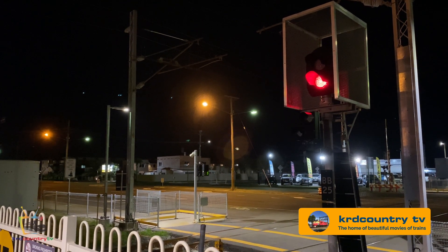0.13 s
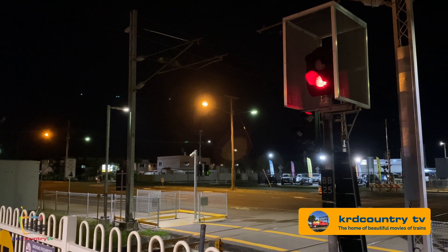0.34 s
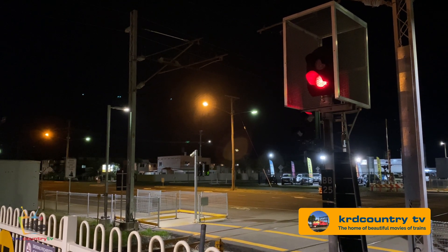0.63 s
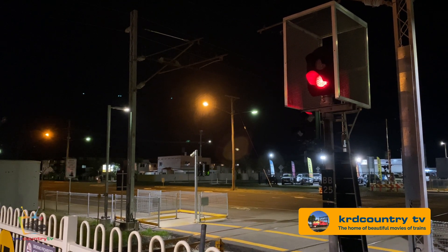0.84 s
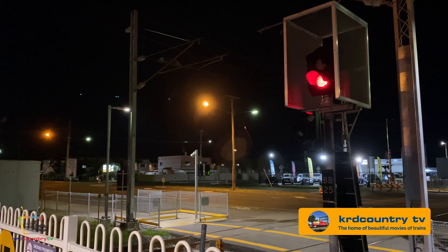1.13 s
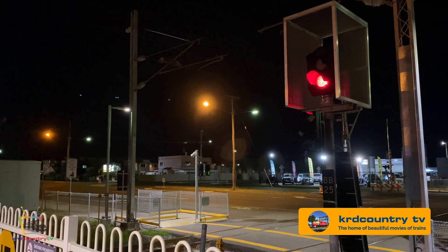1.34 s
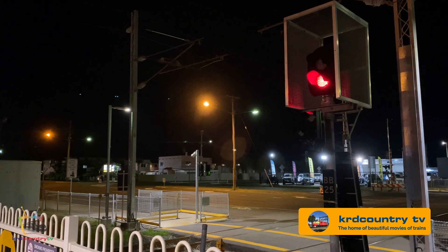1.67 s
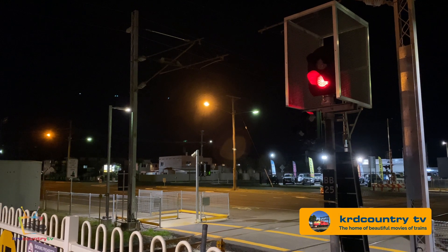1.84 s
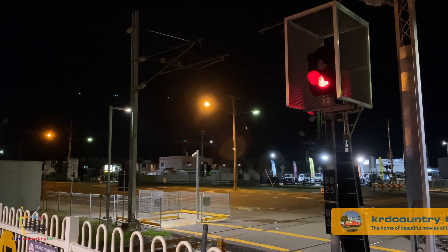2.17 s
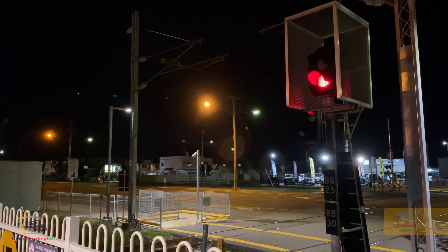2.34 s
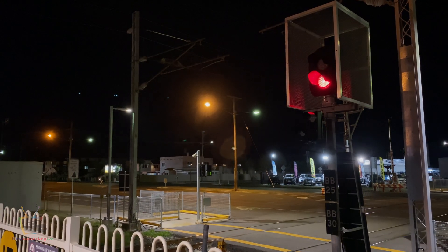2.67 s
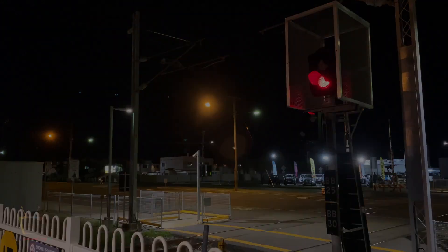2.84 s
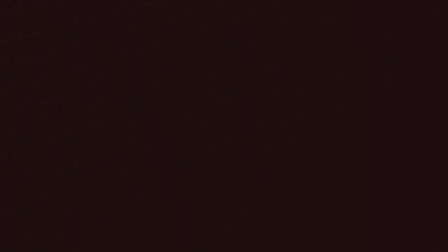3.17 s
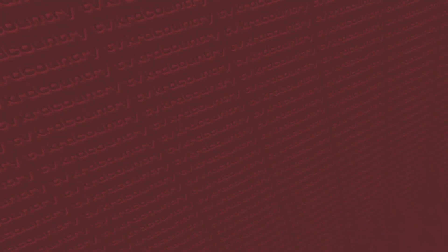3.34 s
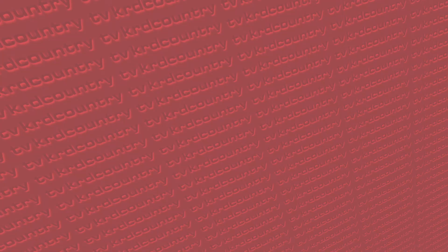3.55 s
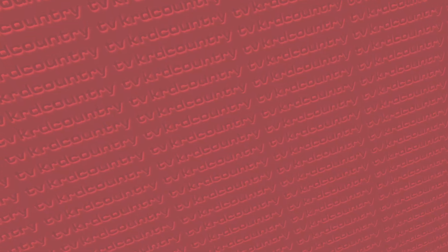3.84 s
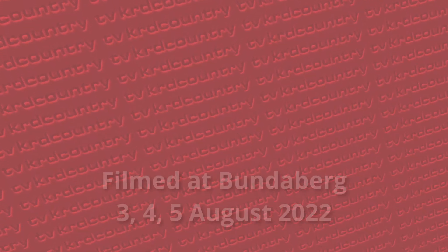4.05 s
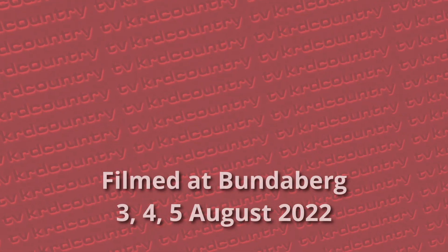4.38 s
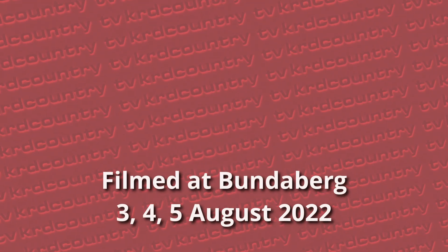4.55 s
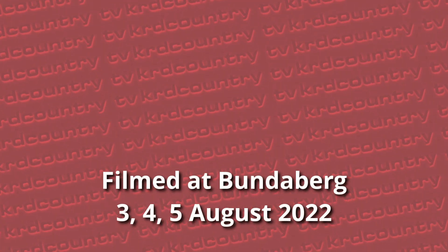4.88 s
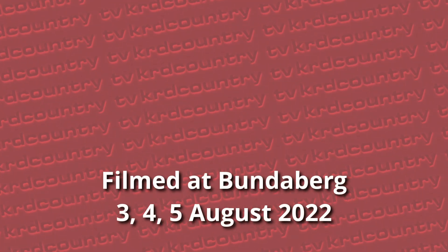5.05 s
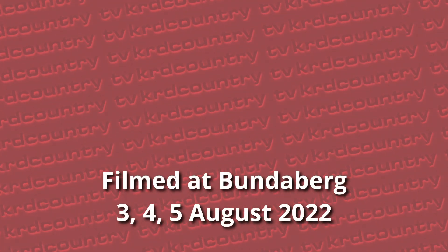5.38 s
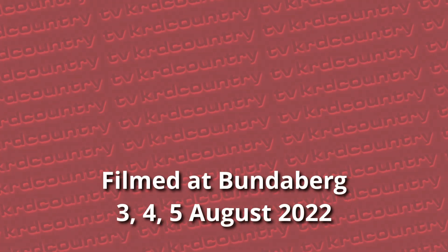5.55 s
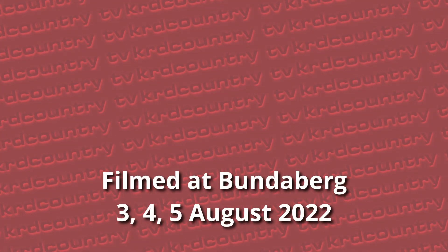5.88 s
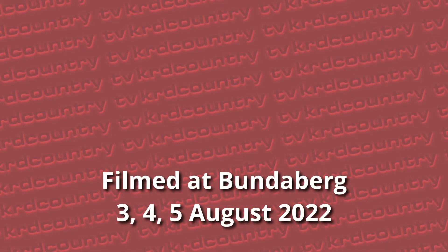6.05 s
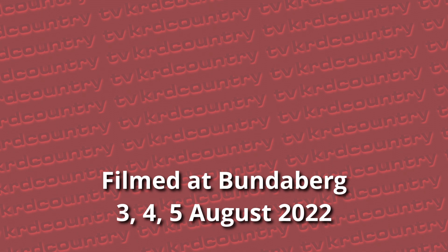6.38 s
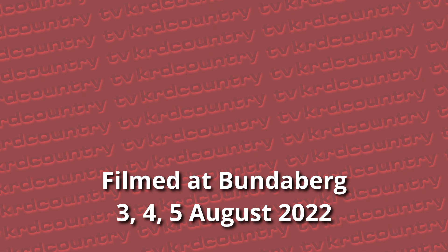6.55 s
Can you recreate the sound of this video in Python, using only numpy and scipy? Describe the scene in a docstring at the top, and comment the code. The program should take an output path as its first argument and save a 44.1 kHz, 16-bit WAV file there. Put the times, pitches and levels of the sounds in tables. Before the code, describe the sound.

Distant low diesel idling at a night crossing switches after three seconds to a close, strong, slowly swelling engine drone with whirring fan and ringing metal.

```python
"""At a level crossing at night, a diesel train engine idles at about 800 rpm, heard from two spots in turn.
At the far spot the exhaust is a low, uneven throb; a quick cross-fade leads to the louder near spot,
with a firing hum that swells slowly, clattering cylinders, a ringing housing and a whining cooling fan.
Hums, buzz and fan are sums of sine tones; throb, clatter, hiss and ringing are shaped noise, part of
which repeats with every engine cycle. Short sine tones come and go on top."""
import sys
import numpy as np
from scipy import signal
from scipy.fft import rfft, irfft, next_fast_len
from scipy.io import wavfile
from scipy.ndimage import uniform_filter1d, map_coordinates

SR = 44100
rng = np.random.default_rng(int(sys.argv[2]) if len(sys.argv) > 2 else 0)


def to_wav(s):
    """Save 16-bit WAV."""
    ch = np.atleast_2d(s).T  # columns
    pcm = np.round(np.clip(ch, -1, 1) * 32767)  # PCM
    wavfile.write(sys.argv[1], SR, pcm.astype(np.int16))


N = 296352

CYCLE_HZ = 6.675  # four-stroke cycles a second, each two turns of the crankshaft
FIRINGS = 12  # firings in each cycle
BLADE_HZ = 225.1  # fan blades passing a second


def amp(db):
    """Turn decibels into a gain."""
    return 10 ** (np.asarray(db) / 20)


def unit(x):
    """Scale x to an average (rms) strength of 1."""
    return x / np.sqrt(np.mean(x ** 2) + 1e-20)


def along(points, hz):
    """Read a table of (frequency, value) points on a log frequency axis."""
    f, value = np.transpose(points)
    return np.interp(np.log(hz + 1), np.log(f + 1), value)


def wobble(rate):
    """Draw a smooth random curve with `rate` random points a second."""
    coarse = np.arange(0, N + 64, 64)  # every 64th sample is enough for a slow curve
    knots = rng.standard_normal(int(N * rate / SR) + 4)
    curve = map_coordinates(knots, [coarse * rate / SR])
    return np.interp(np.arange(N), coarse, curve)


def swell(rows):
    """Turn (time, level) rows into a dB curve about their mean, one value per sample."""
    s, db = np.transpose(rows)
    return np.interp(np.arange(N) / SR, s, db - db.mean())


def filtered(x, response):
    """Filter x with a response that depends on frequency and may be complex."""
    m = next_fast_len(N + SR // 4)  # spare room after the end
    spectrum = rfft(x, m) * response(np.fft.rfftfreq(m, 1 / SR))
    return irfft(spectrum, m)[..., :N]


def turns(hz, drift):
    """Count the turns of a governed shaft whose speed hunts slightly."""
    speed = hz * (1 + drift * wobble(3))
    return np.cumsum(speed) / SR


def lines(turn, orders, levels_db, waver_db, smear, swells=None):
    """Sum tones locked to a shaft; each wavers on its way through the air, at random or along its swell."""
    out = np.zeros(N)
    for order, db in zip(np.round(orders), levels_db):
        phase = 2 * np.pi * (order * turn + rng.random()) + smear * wobble(6)
        change_db = (swells or {}).get(order, waver_db * wobble(3.88))
        out += amp(db + change_db) * np.sqrt(2) * np.sin(phase)
    return out


def clatter(cycle, repeat):
    """Make two noises; a share of their power returns every cycle, as from valves and injectors."""
    size = round(SR / CYCLE_HZ)
    # random phases, equally strong at every multiple of the cycle
    spectrum = np.exp(2j * np.pi * rng.random((2, size // 2 + 1)))
    one_cycle = unit(irfft(spectrum, size))
    pattern = one_cycle[:, (cycle * size).astype(int) % size]
    repeat = np.clip(repeat, 0, 1)
    fresh = rng.standard_normal((2, N))
    return np.sqrt(repeat) * pattern + np.sqrt(1 - repeat) * fresh


def spread(pair, gain, alike):
    """Mix two noises into a coloured left and right of rms 1 with the given likeness."""
    def shares(hz):
        angle = np.arccos(np.clip(along(alike, hz), -.995, .995)) / 2
        return gain(hz) * np.array([np.cos(angle), np.sin(angle)])

    mid, side = filtered(pair, shares)
    return unit(np.array([mid + side, mid - side]))


def microphones(pair, balance, lead):
    """Give the two microphones different colours and arrival phases, as set by frequency."""
    side = np.array([[.5], [-.5]])  # half of each difference goes to either side
    return filtered(pair, lambda hz: amp(side * along(balance, hz)) * np.exp(1j * side * along(lead, hz)))


def patchy(pair, depth_db):
    """Make narrow stretches of the sound's spectrum flicker slightly."""
    spectrum = signal.stft(pair, nperseg=512)[2]
    field = rng.standard_normal(spectrum.shape[1:])
    field = uniform_filter1d(field, size=4, axis=0)  # smooth across frequency
    field = uniform_filter1d(field, size=16, axis=1)  # smooth across time
    return signal.istft(spectrum * amp(depth_db * unit(field)), nperseg=512)[1][:, :N]


# Random short tones, one row of settings: rate [per s], lowest f/Hz, highest f/Hz, typical length t/s,
# level/dB at the lowest, change of level [dB per octave]
STREAK_SETTINGS = (19.5, 750, 2400, 0.1, -42.5, -10.5)


def streaks():
    """Parts of the housing sing for a moment, at random times and pitches; higher ones are weaker."""
    per_s, low_hz, high_hz, length_s, db, tilt_db = STREAK_SETTINGS
    when, pitch, life = rng.random((int(per_s * N / SR), 3)).T
    hz = low_hz * (high_hz / low_hz) ** pitch
    level_db = db + tilt_db * np.log2(hz / low_hz)
    return list(zip(when * N / SR, length_s * (.5 + life), hz, level_db))


# The clearest tones that come and go in the drone: middle t/s, length t/s, f/Hz, level/dB at the top
CLEAR_TONES = [(1.1, 1.5, 543, -51.5), (3.3, .4, 600, -32), (3.43, .25, 624, -36.5), (3.62, .22, 610, -39),
               (4.12, 0.28, 622, -32.5), (4.3, 0.37, 613, -35), (5.34, .18, 623, -34),
               (5.56, 0.3, 620, -34), (5.96, 0.45, 602, -34.5), (6.25, .2, 622, -41)]


def brief_tones(extra=()):
    """Short tones, plus any extra ones, rise out of the machinery and sink back in a smooth arch."""
    t = np.arange(N) / SR
    out, waver = np.zeros(N), .6 * wobble(9)  # phase waver in radians
    for middle_s, length_s, hz, db in list(CLEAR_TONES) + list(extra):
        on = np.abs(t - middle_s) < length_s / 2
        arch = np.cos(np.pi * (t[on] - middle_s) / length_s)
        phase = 2 * np.pi * (hz * t[on] + rng.random()) + waver[on]
        out[on] += amp(db) * arch * np.sqrt(2) * np.sin(phase)
    return out


# A hum not locked to the engine, one row: f/Hz, level/dB
LOOSE_HUM = (318.2, -40)


def side_hum():
    """A second hum just under one of the exhaust lines beats against it."""
    hz, db = LOOSE_HUM
    return lines(turns(hz, drift=0.0021), [1], [db], waver_db=3.0, smear=0.56)


# Tones of the cooling fan: multiple of the blade rate, far level/dB, near level/dB
FAN_LINES = [(1, -56.5, -38.5), (2, -49, -39.5), (3, -49, -39.5), (5, -78, -61), (6, -80, -49)]


def cooling_fan(blades, near, waver_db, smear, swells=None):
    """Passing fan blades sound tones at multiples of their rate."""
    multiples, far_db, near_db = np.transpose(FAN_LINES)
    return lines(blades, multiples, near_db if near else far_db, waver_db, smear, swells)


# Ringing of the engine housing: f/Hz, width [Hz], level/dB
HOUSING_RINGS = [(598.6, 22, -40.5), (619.7, 17, -38.5), (709, 28, -47), (766, 18, -45), (1027, 30, -48.5),
                 (1560, 11, -59), (1815, 16, -55.5), (2042, 18, -58)]


def housing(cycle, alike):
    """The clatter rings the panels and ducts of the engine housing, each in a narrow band."""
    out = np.zeros((2, N))
    for hz, width, db in HOUSING_RINGS:
        mode = lambda f: 1 / (1 + (2 * (f - hz) / width) ** 4)
        out += amp(db) * spread(clatter(cycle, repeat=0.087), mode, alike)
    return out


def machinery(cycle, body_db, hiss_db, colour, alike, repeat, knock):
    """Cylinder clatter swells at each firing, under the smoother hiss of cooling air."""
    low = lambda hz: 1 / np.sqrt(1 + (hz / 1500) ** 12)  # clatter below about 1500 Hz, hiss above
    body_gain = lambda hz: amp(along(colour, hz)) * low(hz)
    hiss_gain = lambda hz: amp(along(colour, hz)) * np.sqrt(1 - low(hz) ** 2)
    firing = 1 + knock * np.cos(2 * np.pi * FIRINGS * cycle)
    body = spread(clatter(cycle, repeat) * firing, body_gain, alike)
    hiss = patchy(spread(clatter(cycle, repeat=0.2), hiss_gain, alike), depth_db=1.6)
    body_level = amp(body_db + 0.43 * wobble(16))
    hiss_level = amp(hiss_db + 0.27 * wobble(22))
    return body_level * body + hiss_level * hiss


SETTLE_DB, SETTLE_S, SETTLE_HZ = 3, 0.93, 850  # extra at the start, fade time, where the upper part begins


def settling(x):
    """The upper part of the sound starts a little louder and settles."""
    upper = filtered(x, lambda hz: 1 - 1 / (1 + (hz / SETTLE_HZ) ** 4))
    extra_db = SETTLE_DB * np.exp(-np.arange(N) / SR / SETTLE_S)
    return x + (amp(extra_db) - 1) * upper


# Colour of the exhaust rumble: f/Hz, relative level/dB
RUMBLE_COLOUR = [(20, -25), (31, -16), (42, -5), (55, 9.5), (80, 2.5), (110, 1), (160, -15), (250, -14),
                 (500, -74)]


def rumble(cycle, alike, throb):
    """Unequal cylinders make the exhaust noise lope once a cycle."""
    lope = 1 + throb * np.cos(2 * np.pi * cycle)
    noise = spread(clatter(cycle, repeat=0.5), lambda hz: amp(along(RUMBLE_COLOUR, hz)), alike)
    return unit(lope) * noise


# Thin buzz of the high exhaust lines: multiples of the engine cycle
HIGH_ORDERS = [126, 144, 150, 156, 162, 198, 252, 270, 288, 306, 342, 360]
# and for each multiple its level/dB
HIGH_LEVELS = [-50.5, -46.5, -53, -52, -55, -55, -62, -58, -59, -62, -60, -59]


def exhaust_buzz(cycle):
    """High multiples of the engine cycle waver strongly and make a thin buzz."""
    return lines(cycle, HIGH_ORDERS, HIGH_LEVELS, waver_db=3.0, smear=0.83)


# Exhaust hum: multiples of the engine cycle (12 is the firing rate)
EXHAUST_ORDERS = [6, 7, 9, 10, 12, 13, 15, 17, 18, 21, 26, 30, 33, 35, 36, 48, 54, 72]


def exhaust_hum(cycle, levels_db, waver_db, smear, swells=None):
    """Exhaust pulses sound as tones at multiples of the engine cycle."""
    return lines(cycle, EXHAUST_ORDERS, levels_db, waver_db, smear, swells)


# Exhaust hum at the far spot, one value for each multiple: level/dB
FAR_HUM_LEVELS = [-48, -54, -61, -57, -37, -58, -59, -51, -46, -53, -55.5, -53, -64, -59, -45.5, -52, -57,
                  -67]
# Colour of the machinery: f/Hz, relative level/dB
FAR_MACHINE_COLOUR = [(70, -26), (135, -1), (200, -6.5), (300, -6), (420, -6.5), (510, -8.5), (700, -7),
                      (870, -11), (1050, -9.5), (1250, -14), (1600, -14), (1900, -15), (2250, -19.5),
                      (2900, -22.5), (3800, -28.5), (4900, -30.5), (6000, -28.5), (7500, -42.5),
                      (10000, -44.5), (12000, -53), (14000, -45), (15000, -52)]
# Left-right likeness: f/Hz, coherence [1 is the same on both sides]
FAR_LIKENESS = [(60, 0.91), (170, 1), (250, 0.63), (290, 0.35), (450, 0.66), (700, 0.78), (950, 0.27),
                (1200, 0.65), (1650, 0.63), (2050, 0.18), (2550, 0.75), (3400, .15), (4800, .38),
                (8000, 0.16)]
# Left minus right: f/Hz, level/dB
FAR_SIDES = [(60, -1.5), (110, -4), (240, -5.5), (450, -1.5), (570, 1.5), (900, -1), (1250, 1.5),
             (1750, -1.8), (4000, -0.5), (8000, 0)]
# How far the left is ahead of the right: f/Hz, phase [radians]
FAR_PHASE_LEAD = [(70, 0), (200, 0.54), (330, 1.27), (500, 1.6), (800, 2), (1000, 3), (1700, 2.9),
                  (2350, 0), (3200, 1.3), (3800, -1), (5000, 2.5), (6300, 7)]


def far_spot(cycle, blades):
    """Distant and off to one side: mostly the low throb of the exhaust."""
    hum = exhaust_hum(cycle, FAR_HUM_LEVELS, waver_db=1.2, smear=0.12)
    fan = cooling_fan(blades, near=False, waver_db=1.5, smear=0.48)
    throb = amp(-41.5) * rumble(cycle, FAR_LIKENESS, throb=0.092)
    works = settling(machinery(cycle, body_db=-36.5, hiss_db=-51.5, colour=FAR_MACHINE_COLOUR,
                               alike=FAR_LIKENESS, repeat=0.33, knock=0.037))
    pair = hum + fan + throb + works + brief_tones()
    return microphones(pair, FAR_SIDES, FAR_PHASE_LEAD)


# Exhaust hum at the near spot, one value for each multiple: level/dB
NEAR_HUM_LEVELS = [-47, -47.5, -45, -47, -32.5, -43, -39, -49, -34, -50, -45, -43.5, -48.5, -46.5, -34,
                   -40.5, -41, -42.5]
# Slow swells of exhaust lines 12, 36, 54 and 72, used about their mean: t/s, level/dB
SWELL_12 = [(3.1, -28), (3.35, -37.5), (3.6, -30), (4.5, -31.5), (5, -29), (5.5, -28), (6.1, -31),
            (6.6, -29)]
SWELL_36 = [(3.05, -35), (3.35, -28), (3.65, -32.5), (4.05, -36), (4.4, -34), (4.75, -28.5), (5.2, -32),
            (5.75, -29.5), (6.3, -32.5), (6.7, -32.5)]
SWELL_54 = [(3.05, -47), (3.45, -43), (3.72, -38), (4.05, -39), (4.5, -42), (4.95, -47), (5.25, -32),
            (5.55, -55), (5.85, -38), (6.05, -33), (6.2, -46), (6.35, -37), (6.7, -35)]
SWELL_72 = [(3.05, -48), (3.8, -38), (4.5, -38), (4.9, -37.5), (5.2, -45), (5.6, -37.5), (6.05, -47),
            (6.25, -40), (6.7, -47)]
# Slow swells of fan lines 3 and 6, used about their mean: t/s, level/dB
FAN_SWELL_3 = [(3, -48), (3.3, -37), (3.55, -32), (3.85, -36.5), (4.15, -37.5), (4.6, -40), (5, -33.5),
               (5.45, -36.5), (5.9, -37.5), (6.2, -30), (6.45, -47), (6.7, -43)]
FAN_SWELL_6 = [(3.2, -47.5), (3.5, -53), (3.85, -53), (4.05, -46), (4.5, -46.5), (4.9, -62), (5.4, -48),
               (6, -56), (6.6, -46.5)]
# Colour of the machinery: f/Hz, relative level/dB
NEAR_MACHINE_COLOUR = [(70, -22), (135, -3.5), (200, -1), (270, -3.5), (420, -3.5), (520, -5.5),
                       (655, -5.5), (720, -4), (870, -11), (1080, -8.5), (1250, -17), (1500, -15),
                       (1900, -20), (2800, -23.5), (3900, -30), (5000, -30), (6100, -31.5), (8400, -42.5),
                       (10200, -40.5), (12000, -49), (15000, -46)]
# Left-right likeness: f/Hz, coherence [1 is the same on both sides]
NEAR_LIKENESS = [(60, 0.97), (300, 0.99), (650, 0.94), (800, 0.89), (1050, 0.59), (1400, 0.63),
                 (1800, 0.14), (2600, 0.17), (3200, 0.081), (3900, 0.4), (5200, 0.061), (6200, 0.45),
                 (8000, 0.1)]
# Left minus right: f/Hz, level/dB
NEAR_SIDES = [(60, -1.8), (160, -2.5), (245, -3), (310, 0), (550, -0.5), (780, 2.5), (1600, 0), (2400, 0.5),
              (3400, 3.5), (4500, -0.5), (5600, 1), (7000, -5), (9500, 0)]
# How far the left is ahead of the right: f/Hz, phase [radians]
NEAR_PHASE_LEAD = [(90, 0), (170, 0.16), (280, .5), (480, 0.54), (620, 0.66), (850, 0.77), (1300, 1.02),
                   (1750, 3), (2400, 1.84), (3000, 2.5), (3600, 0.6), (6500, 0)]


def near_spot(cycle, blades):
    """Close and nearly ahead: a full hum with a thin buzz, the whining fan and the ringing housing."""
    hum_swells = {12: swell(SWELL_12), 36: swell(SWELL_36), 54: swell(SWELL_54), 72: swell(SWELL_72)}
    fan_swells = {3: swell(FAN_SWELL_3), 6: swell(FAN_SWELL_6)}
    hum = exhaust_hum(cycle, NEAR_HUM_LEVELS, waver_db=0.7, smear=0.24, swells=hum_swells)
    fan = cooling_fan(blades, near=True, waver_db=2.5, smear=0.56, swells=fan_swells)
    throb = amp(-38.0) * rumble(cycle, NEAR_LIKENESS, throb=0.21)
    works = machinery(cycle, body_db=-26.5, hiss_db=-40, colour=NEAR_MACHINE_COLOUR,
                      alike=NEAR_LIKENESS, repeat=0.36, knock=0.018)
    ringing = housing(cycle, NEAR_LIKENESS)
    tones = side_hum() + brief_tones(streaks())
    pair = hum + exhaust_buzz(cycle) + fan + throb + works + ringing + tones
    return microphones(pair, NEAR_SIDES, NEAR_PHASE_LEAD)


# Cross-fade from the far to the near spot, one row: start t/s, end t/s
CROSS_FADE = (2.87, 3.02)


def scene():
    """The same idling engine, cross-faded from the far spot to the near one."""
    cycle = turns(CYCLE_HZ, drift=.001)
    blades = turns(BLADE_HZ, drift=0.0013)
    near = np.interp(np.arange(N) / SR, CROSS_FADE, [0, 1])
    far = np.sqrt(1 - near ** 2)  # keeps the summed power of the two gains at 1
    return far * far_spot(cycle, blades) + near * near_spot(cycle, blades)


TOP_HZ = 15250  # nothing passes above this


def record(dry):
    """The sound eases in and out within a few milliseconds, and everything above the band limit is cut."""
    ease = signal.windows.tukey(N, .001)
    return filtered(dry * ease, lambda hz: hz < TOP_HZ)


dry = scene()
out = record(dry)
to_wav(out)
```